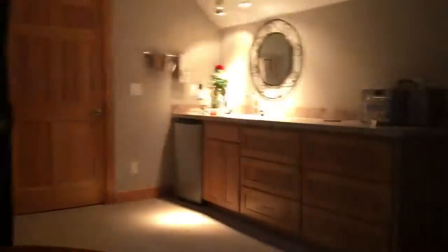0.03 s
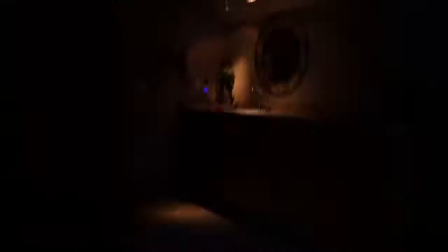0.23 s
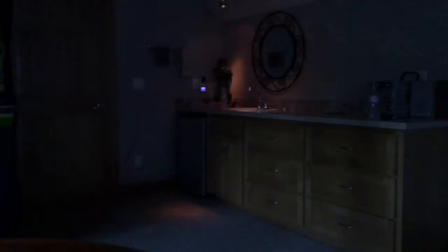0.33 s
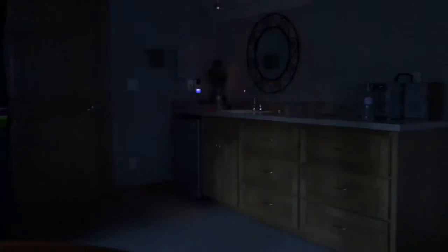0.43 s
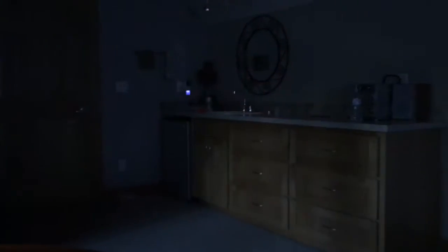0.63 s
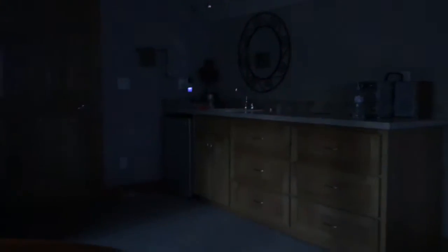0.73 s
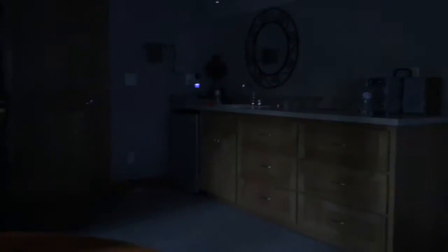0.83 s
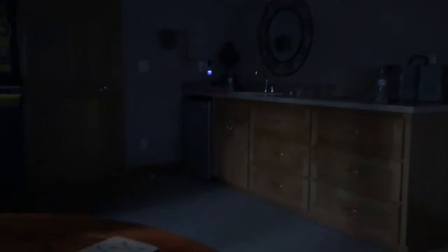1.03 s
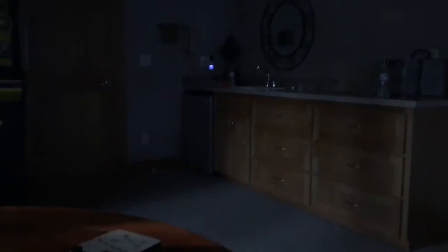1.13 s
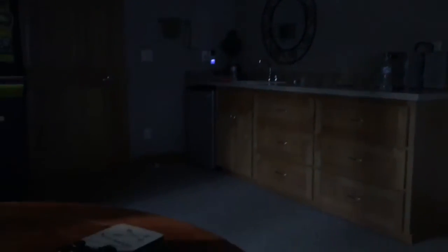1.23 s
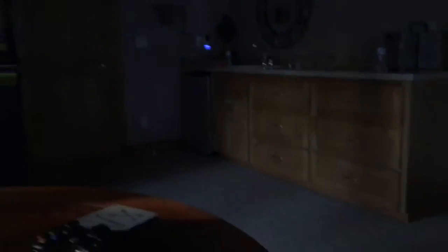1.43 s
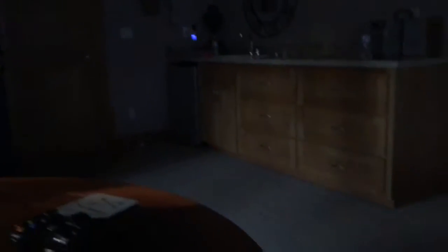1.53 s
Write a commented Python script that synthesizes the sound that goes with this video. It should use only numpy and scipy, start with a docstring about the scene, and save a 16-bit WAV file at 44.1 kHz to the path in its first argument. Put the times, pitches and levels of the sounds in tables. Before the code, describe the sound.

A light switch snaps off, then a softer double clack in a quiet room.

```python
"""Light switch in a quiet room

A wall switch is snapped off close by in a carpeted room. The plastic rocker cracks, its spring
rings, the hollow wall thumps and the room answers, with a slow boom underneath. A softer, duller
double clack follows, with soft thuds of the hand and a few faint handling ticks over a low hum."""
import sys
import numpy as np
from scipy import signal
from scipy.fft import rfft, irfft, next_fast_len
from scipy.io import wavfile
from scipy.ndimage import map_coordinates

SR = 44100
rng = np.random.default_rng(int(sys.argv[2]) if len(sys.argv) > 2 else 0)


def unload_audio(sound):
    """Save the sound as a 16-bit wav file, at the path given as the first command line argument."""
    columns = np.transpose(np.atleast_2d(sound))
    # keep every value between -1 and 1, then stretch to whole-number steps
    steps = np.round(np.clip(columns, -1, 1) * 32767)
    wavfile.write(sys.argv[1], SR, steps.astype(np.int16))


N = 70560
t = np.arange(N) / SR


def amp(db):
    """Decibels to gain."""
    return 10 ** (np.asarray(db) / 20)


def curve_at(points, hz):
    """Read a curve of (Hz, value) points on a log frequency axis."""
    freqs, values = np.transpose(points)
    return np.interp(np.log(hz + 1), np.log(freqs + 1), values)


def attack(rise_s):
    """Exponential rise from 0 towards 1."""
    return 1 - np.exp(-t / rise_s)


def decay(age_s, t60_s):
    """Exponential fall by 60 dB in t60_s."""
    return np.exp(-np.log(1000) * age_s / t60_s)


def equalise(x, colour_db):
    """Filter x by a gain in dB given as a function of frequency."""
    size = next_fast_len(2 * len(x))
    gain = amp(colour_db(np.fft.rfftfreq(size, 1 / SR)))
    return irfft(rfft(x, size) * gain, size)[:len(x)]


def noise(colour_db):
    """Coloured noise of rms 1."""
    x = equalise(rng.standard_normal(N), colour_db)
    return x / np.sqrt(np.mean(x ** 2))


def delayed(x, delay_s):
    """Slide x later on the timeline."""
    return np.pad(x, (round(delay_s * SR), 0))[:N]


# Colour of the still air: freq_hz, gain_db
AIR_COLOUR = [(15, -14), (33, -6), (56, -2), (81, -7), (160, -5), (234, -5), (340, -6), (408, -13),
              (560, -18), (920, -20.5), (1550, -23), (2650, -25.5), (4600, -30), (7750, -33.5),
              (11800, -36.5), (15000, -42)]
# Partials of the appliance hum: pitch_hz, level_db
HUM_PARTIALS = [(59.5, -68), (119.5, -71), (331, -68)]

def room_tone(air_db=-59.2, waver_db=2, waver_hz=8):
    """A bed of low rumble and hiss under a slightly wavering appliance hum."""
    hum = 0
    for hz, db in HUM_PARTIALS:
        waver = map_coordinates(rng.standard_normal(64), [t * waver_hz], mode="mirror")
        tone = np.sqrt(2) * np.sin(2 * np.pi * (hz * t + rng.random()))
        hum += amp(db + waver_db * waver) * tone
    return hum + amp(air_db) * noise(lambda hz: curve_at(AIR_COLOUR, hz))


# Reverb time across the spectrum: freq_hz, t60_s
REVERB_DECAY = [(60, .5), (200, .38), (600, .36), (1500, .35), (4000, .345), (8000, .305), (15000, .25)]
# Colour of the reverb: freq_hz, gain_db
REVERB_COLOUR = [(60, -4.5), (300, 2), (800, -1), (1200, -1), (3000, -3.5), (7000, -6), (9500, -5.5),
                 (12000, -9), (15000, -10)]

def reverb(x, return_db=1, predelay_s=0.003, build_s=0.004):
    """The room's short, diffuse tail; the treble dies first."""
    freqs, age_s, spectrum = signal.stft(rng.standard_normal(N), SR, nperseg=256)
    spectrum *= decay(age_s, curve_at(REVERB_DECAY, freqs)[:, None])
    tail = signal.istft(spectrum, SR)[1][:N] * attack(build_s)
    tail = equalise(tail / np.linalg.norm(tail), lambda hz: curve_at(REVERB_COLOUR, hz))
    return amp(return_db) * signal.fftconvolve(x, delayed(tail, predelay_s))[:N]


# The room's lowest modes: pitch_hz, level_db, t60_s, rise_s
BOOM_MODES = [(40, -12.5, 0.61, 0.081), (60, -17.5, .35, .015)]

def room_boom():
    """Each wall thump slowly swells the room's lowest modes."""
    swell = sum(amp(db) * attack(rise_s) * decay(t, t60_s) * np.sin(2 * np.pi * hz * t)
                for hz, db, t60_s, rise_s in BOOM_MODES)
    return sum(amp(thump_db) * delayed(swell, start_s) for start_s, _, _, thump_db, *_ in SWITCH_HITS)


# Faint handling ticks: start_s, level_db, pitch_hz, width_hz
TICK_CUES = [(.755, -56, 3800, 2000), (.759, -54.5, 9500, 10000), (.797, -59, 1900, 1200),
             (.822, -61, 6000, 1000), (.903, -59, 1200, 500), (.911, -59, 4200, 400)]

def handling_ticks(rise_s=0.003, t60_s=0.07):
    """Light touches, each sounding a resonance of its own, heard in the room."""
    envelope = attack(rise_s) * decay(t, t60_s)
    ticks = 0
    for start_s, db, pitch_hz, width_hz in TICK_CUES:
        resonance = noise(lambda hz: -10 * np.log10(1 + (2 * (hz - pitch_hz) / width_hz) ** 2))
        ticks += delayed(amp(db) * envelope * resonance, start_s)
    return ticks + reverb(ticks)


# Bumps of the hand on the wall: start_s, level_db
THUD_CUES = [(.506, -23), (.542, -26), (.562, -28.5), (.588, -31), (.620, -38.5), (.750, -45),
             (.772, -44.5)]
# Dark colour of a bump: freq_hz, gain_db
HAND_COLOUR = [(30, -25), (70, -34), (108, 7), (150, -1), (250, -1.5), (350, -6), (450, -15), (700, -20),
               (2000, -23), (8000, -66)]

def hand_thuds(rise_s=0.003, t60_s=0.1446):
    """The soft hand meets the wall: low, toneless bumps."""
    envelope = attack(rise_s) * decay(t, t60_s)
    return sum(delayed(amp(db) * envelope * noise(lambda hz: curve_at(HAND_COLOUR, hz)), start_s)
               for start_s, db in THUD_CUES)


def ring(modes, scatter_db=1):
    """Damped modes, each a little stronger or weaker at every hit."""
    return sum(amp(db + scatter_db * rng.standard_normal()) * decay(t, t60_s) * np.sin(2 * np.pi * hz * t)
               for hz, db, t60_s in modes)


# Body of the hollow wall: pitch_hz, level_db, t60_s
WALL_MODES = [(103.4, -21, 0.45), (121.4, -18.5, 0.45), (150.27, -11.5, 0.33), (174.7, -3, 0.2),
              (212, 9.5, 0.082), (254.7, -9.5, 0.31), (286.8, -11, 0.25), (332.6, -7.5, 0.28),
              (367.7, -9.5, 0.27), (383.7, -12, .24), (527, -14.5, .14), (642, -3.5, 0.11), (671, -7, 0.09),
              (1012, -21, .16)]

def wall_thump(rise_s=0.0053):
    """The hollow wall rings up just behind the crack and gives it weight."""
    return ring(WALL_MODES) * (1 - np.exp(-(t / rise_s) ** 2))


# Colour of the plastic's crack: freq_hz, gain_db
PLASTIC_COLOUR = [(60, -25.5), (150, -6), (350, -1), (480, -2.5), (570, -2.5), (660, 2.5), (790, -8.5),
                  (980, -0.5), (1200, -6), (1800, -2), (2500, -3.5), (3800, -3), (5000, -6.5), (6700, -4),
                  (7600, -7), (10000, -9.5), (12200, -9), (16000, -19)]
# Thin ring of the spring and cover plate: pitch_hz, level_db, t60_s
SPRING_MODES = [(1295, -35, .22), (1800, -31, .22), (2462, -27, .22), (2681, -30, .22), (3372, -33, .25),
                (3790, -33, .2), (4378, -29, .2), (4675, -32, .22), (5538, -34, .2), (6627, -31, .28),
                (6845, -26.5, .26), (12170, -24, .08)]

def rocker_crack(tilt_db, rise_s, spring_db, t60_s=0.062):
    """The plastic strikes in a burst of noise and sets the spring ringing; more tilt is brighter."""
    burst = noise(lambda hz: curve_at(PLASTIC_COLOUR, hz) + tilt_db * np.log2(hz + 500))
    spring = amp(spring_db) * ring(SPRING_MODES)
    return (burst * decay(t, t60_s) + spring) * attack(rise_s)


# Hits of the rocker, the snap and then the double clack (spring_db is relative to the crack):
# start_s, crack_db, tilt_db_per_octave, thump_db, rise_s, spring_db
SWITCH_HITS = [(0.2117, -45, -3.5, -61, 0.0011, 2), (0.2309, -13.5, 0.5, -24.5, 0.0003, 5.5),
               (0.2325, -10.5, -0.5, -24, .0004, 3), (0.2352, -7.5, -0.5, -8, 0.0005, -1.5),
               (.5060, -29.5, -3.5, -29.5, 0.00044, -17), (0.5105, -20, -3.5, -28.5, 0.0012, -8),
               (.5150, -26, 0.5, -37, 0.00035, -19), (.5410, -25, -3, -39, 0.0031, -11.5),
               (.5510, -32, 0.1, -55, 0.00051, -15)]

def light_switch(echo_s=0.043, crack_echo_db=-17.5, thump_echo_db=-11.5, thump_send_db=-16):
    """Each hit layers a crack and a thump, with reverb and a slap off the far wall."""
    track = np.zeros(N)
    for start_s, crack_db, tilt_db, thump_db, rise_s, spring_db in SWITCH_HITS:
        crack = amp(crack_db) * rocker_crack(tilt_db, rise_s, spring_db)
        thump = amp(thump_db) * wall_thump()
        slap = delayed(amp(crack_echo_db) * crack + amp(thump_echo_db) * thump, echo_s)
        tail = reverb(crack + amp(thump_send_db) * thump)
        track += delayed(crack + thump + slap + tail, start_s)
    return track


def scene():
    """Mono mix: the switch up front, handling, boom and room tone behind it."""
    return (light_switch() + handling_ticks() + hand_thuds() + room_boom() + room_tone())[None]


def record(dry, ceiling=1.05, cutoff_hz=15750):
    """A soft clip rounds the highest peaks, then a steep low-pass trims the top."""
    rounded = dry / (1 + np.abs(dry / ceiling) ** 6) ** (1 / 6)
    lowpass = signal.ellip(10, 0.1, 80, cutoff_hz, fs=SR, output="sos")
    return signal.sosfilt(lowpass, rounded)


dry = scene()
out = record(dry)
unload_audio(out)
```